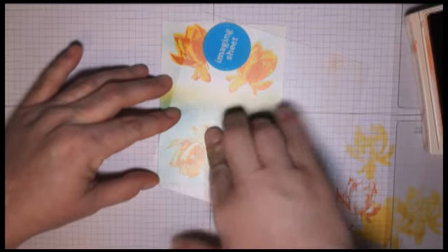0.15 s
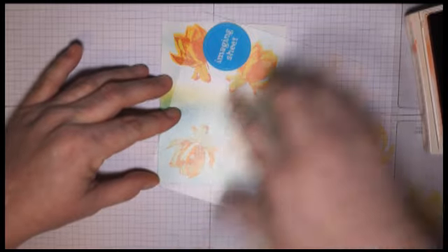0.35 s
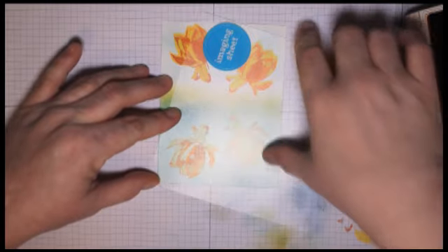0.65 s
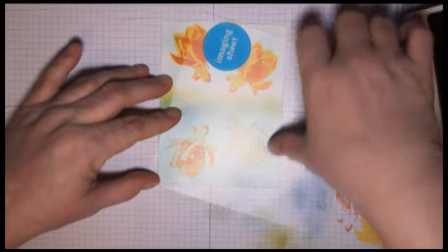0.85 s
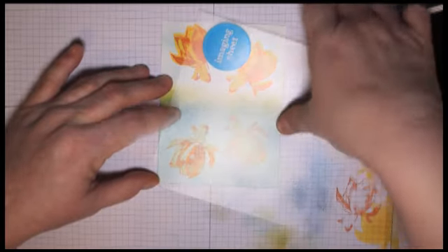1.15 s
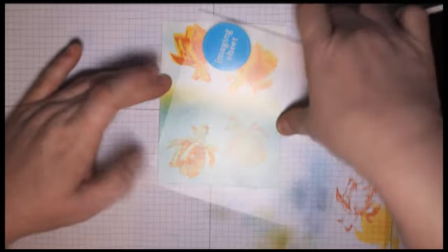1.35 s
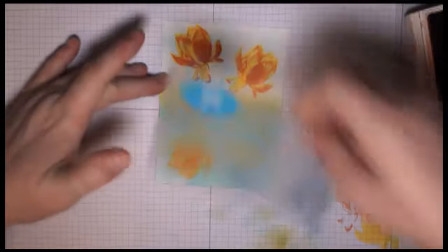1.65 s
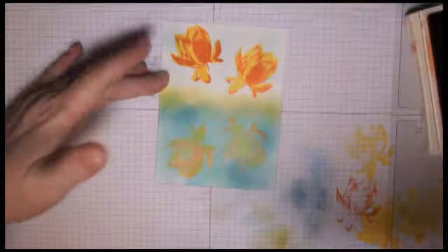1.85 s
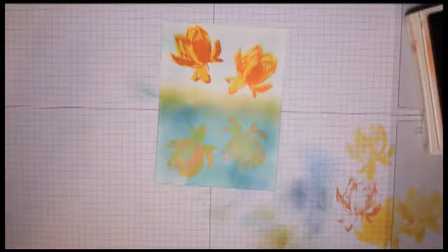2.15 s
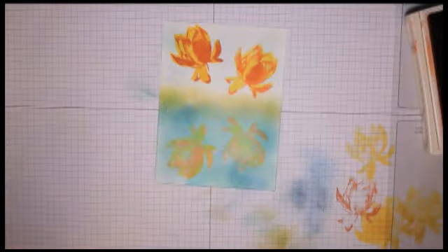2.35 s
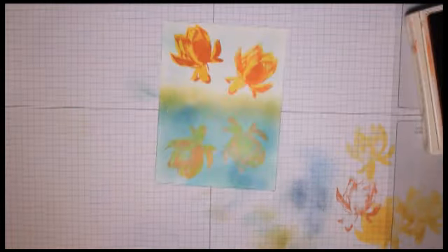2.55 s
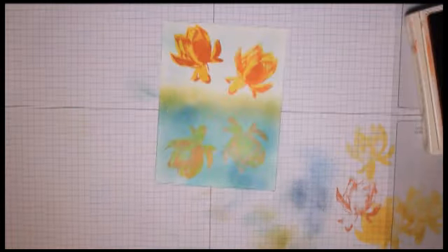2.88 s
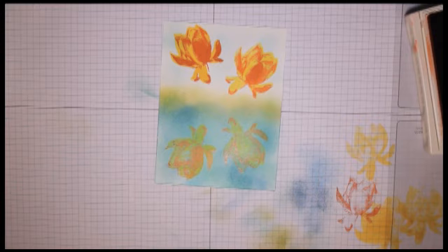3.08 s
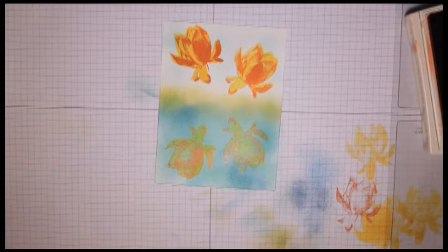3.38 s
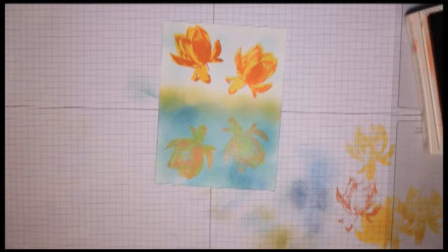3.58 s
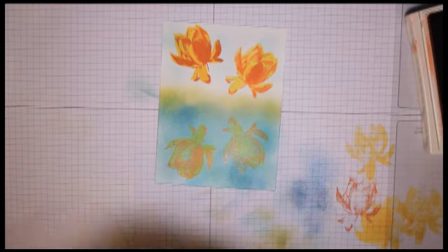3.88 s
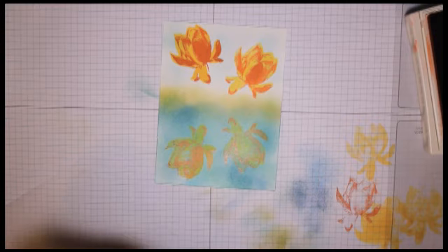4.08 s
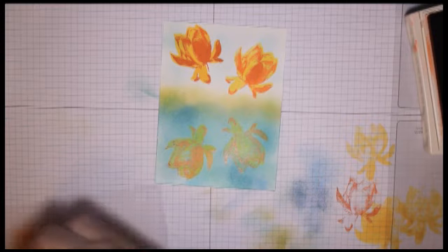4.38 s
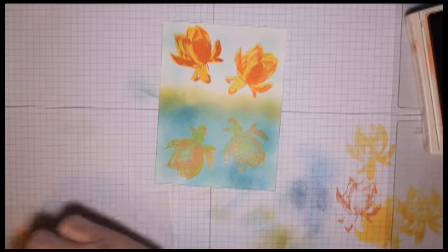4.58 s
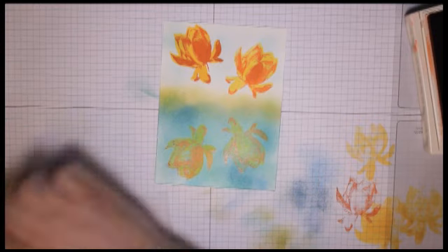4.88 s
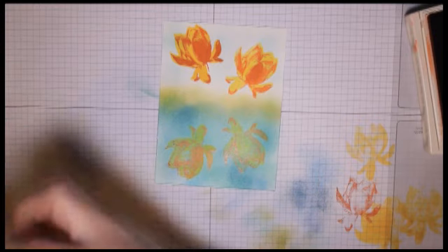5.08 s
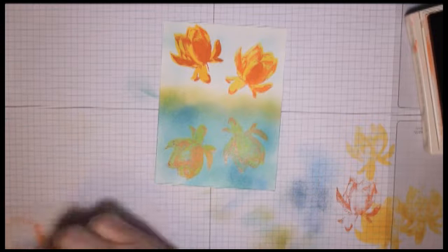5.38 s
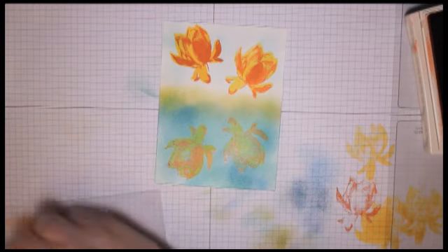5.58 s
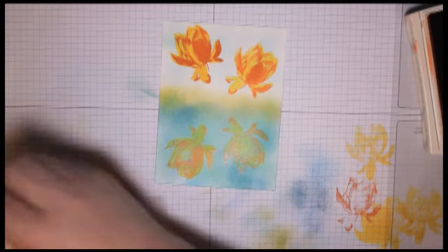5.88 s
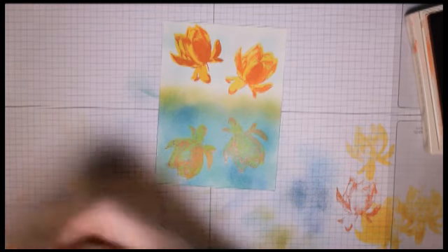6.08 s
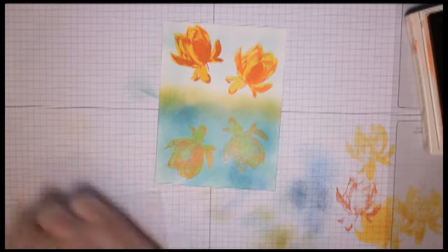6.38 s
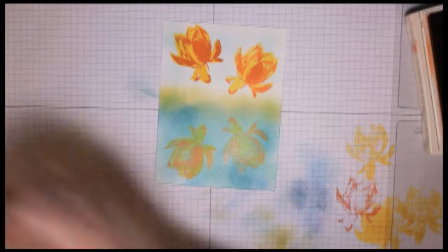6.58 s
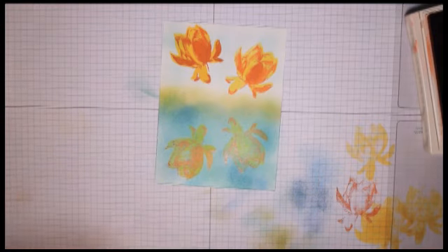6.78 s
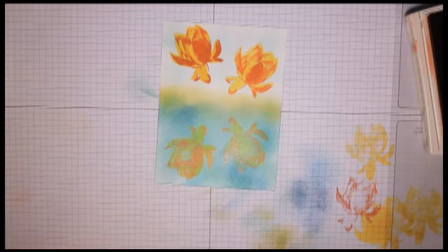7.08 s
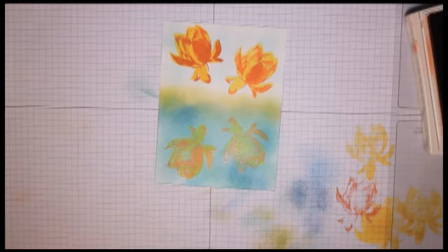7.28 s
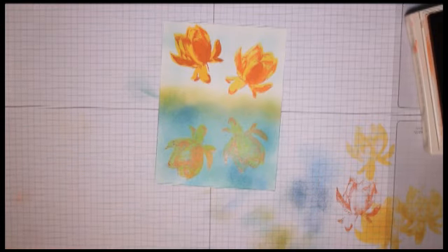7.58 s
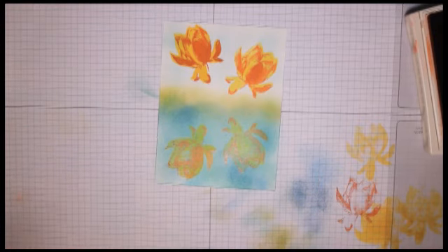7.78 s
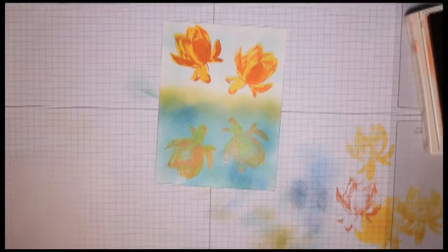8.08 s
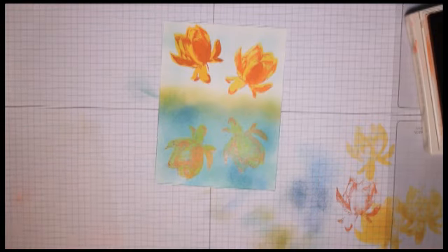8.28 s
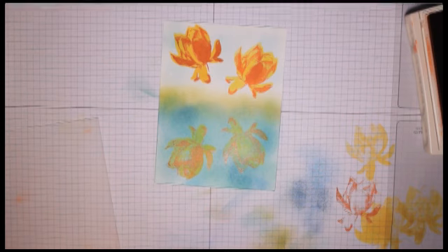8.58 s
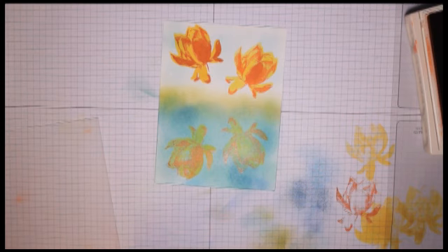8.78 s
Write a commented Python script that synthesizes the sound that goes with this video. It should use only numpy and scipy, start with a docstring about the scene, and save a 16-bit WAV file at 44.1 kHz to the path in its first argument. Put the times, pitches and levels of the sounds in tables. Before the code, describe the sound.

A quiet, close sound in a small room with a short decay, over faint motor hum and steady soft hiss. From 0 to 0.9 s, fingertips give faint rubs and short grainy strokes on card, with light taps. Between 1.2 and 1.65 s come several crisp ticks and papery scuffs, then faint sliding and a small tap at 2 s. At 2.7 s a hard, bright click strikes the table, followed by two lighter ones. From 3 to 5 s the plastic sheet slides in airy, uneven swishes, with tiny ticks and soft low bumps near 4.2 s. Gentler short strokes continue to 7 s, with dull knocks at 6.3, 6.5 and 6.9 s. At 7.17 s the edge skids squeakily; at 7.32 s the sheet buckles with a loud rising pop and hollow thump, then a weaker, ringing pop at 7.44 s. A crisp tap at 7.96 s and fading slides and ticks finish.

```python
"""At a craft table in a small room, hands rub a card and handle a clear plastic sheet close to one microphone.
The sheet slides as shaped noise; short noise bursts are scuffs and the bright part of some taps.
Rubbed card and skidding edge ring as friction through resonances; taps and damped low notes are decaying modes.
Twice the sheet buckles with a pop, a fast upward sweep that rings on, with low notes as its body.
The room answers as a decaying noise tail; a faint motor hum and a steady hiss lie under it all."""
import sys
import numpy as np
from scipy import signal
from scipy.fft import rfft, irfft, next_fast_len
from scipy.io import wavfile

SR = 44100
rng = np.random.default_rng(int(sys.argv[2]) if len(sys.argv) > 2 else 0)


def master(y):
    """Save y as 16-bit WAV."""
    cut = np.clip(np.atleast_2d(y).T, -1, 1)
    pcm = np.round(cut * 32767)  # scale
    wavfile.write(sys.argv[1], SR, pcm.astype(np.int16))


N = 394232
T = np.arange(N) / SR


def amp(db):
    """Decibels to gain."""
    return 10 ** (np.asarray(db) / 20)


def unit(x):
    """Scale to rms 1."""
    return x / np.sqrt(np.mean(x ** 2))


def seconds(length):
    """Time axis of a short sound."""
    return np.arange(int(length * SR)) / SR


def add(out, start_s, x):
    """Mix x into out from a given time."""
    i = int(start_s * SR)
    out[i:i + len(x)] += x[:len(out) - i]


def cut(x, hz, kind, order=2):
    """Low-pass or high-pass."""
    sos = signal.butter(order, min(hz, .45 * SR), kind, fs=SR, output="sos")
    return signal.sosfilt(sos, x)


def band(x, hz, width_hz):
    """One resonance, gain 1 at its centre."""
    centre_hz = min(hz, SR / 3)
    sharpness = hz / min(width_hz, SR / 3)
    b, a = signal.iirpeak(centre_hz, sharpness, fs=SR)
    return signal.lfilter(b, a, x)


def colour(x, points):
    """Shape the spectrum through points of pitch_hz, level_db; rms 1."""
    hz, db = np.transpose(points)
    size = next_fast_len(len(x))
    f = np.maximum(np.fft.rfftfreq(size, 1 / SR), 1)
    gain = amp(np.interp(np.log(f), np.log(hz), db))
    return unit(irfft(rfft(x, size) * gain, size)[:len(x)])


def decay(t, t60_s):
    """Exponential fade that falls 60 dB in t60_s."""
    return np.exp(-np.log(1000) * t / t60_s)


def ring(modes, t):
    """Sum of fading sine modes."""
    return sum(amp(db) * np.sin(2 * np.pi * hz * t) * decay(t, t60_s) for hz, t60_s, db in modes)


def walk(rate_hz):
    """Random drift with spread 1: straight lines between rate_hz random values a second."""
    values = rng.standard_normal(4096)
    return unit(np.interp(T * rate_hz, np.arange(len(values)), values))


def friction(grain_db, patchy_db):
    """Countless tiny slips of uneven size, bunched where the surfaces cling."""
    unevenness = np.minimum(rng.exponential(size=N), 6)
    slips = rng.standard_normal(N) * amp(grain_db * unevenness)
    return unit(slips * amp(patchy_db * walk(160)))


def flexing(x, wander_db):
    """As the sheet bends, neighbouring bands of its sound swell and sink on their own."""
    size = next_fast_len(N)
    octave = np.log2(np.maximum(np.fft.rfftfreq(size, 1 / SR), 1) / 1000)
    spectrum, out = rfft(x, size), np.zeros(N)
    centres = np.arange(0, 3.7, 1 / 4)  # octaves above 1 kHz
    for weight in np.eye(len(centres)):
        one_band = irfft(spectrum * np.interp(octave, centres, weight), size)[:N]
        out += amp(wander_db * walk(18)) * one_band
    return unit(out)


def stroke_of(x, start_s, length_s, fade_db):
    """A piece of friction that grips quickly, fades (swells if fade_db is negative) and lets go."""
    t = seconds(length_s + 0.0023)
    grip = np.clip(t / .003, 0, 1)
    release = np.clip((t[-1] - t) / .009, 0, 1)
    piece = x[int(start_s * SR):][:len(t)]
    return unit(piece * grip * release * amp(-fade_db * t / length_s))


def scrapes(strokes, resonances, grain_db, fade_db):
    """Stick and slip rings a few stiff resonances."""
    out, slips = np.zeros(N), friction(grain_db, patchy_db=1.2)
    body = sum(amp(db) * band(slips, hz, width_hz) for hz, width_hz, db in resonances)
    for start_s, length_s, db in strokes:
        add(out, start_s, amp(db) * stroke_of(body, start_s, length_s, fade_db))
    return out


# motor and mains hum: pitch_hz, level_db (rms, around which it wavers)
HUM_TONES = [(97, -64.5), (119.5, -64), (177, -59.5), (199.5, -68.5), (240.5, -63), (254, -69),
             (280, -74.5), (560, -71), (705, -81.5)]
# colour of room air and microphone hiss: pitch_hz, level_db (relative)
AIR_COLOUR = [(25, -21.5), (55, -10.5), (80, -9.5), (100, -10), (145, -1), (260, -1), (350, -6),
              (580, -3.5), (950, -8), (2500, -14.5), (5500, -17), (7000, -19.5), (12000, -21)]
AIR_DB = -53


def background():
    """Slightly wavering hum over even room noise."""
    hum = np.zeros(N)
    for hz, db in HUM_TONES:
        gain = amp(db + 2.16 * walk(6.5)) * np.sqrt(2)
        phase = 2 * np.pi * (hz * T + rng.random()) + .5 * walk(6.4)
        hum += gain * np.sin(phase)
    return hum + amp(AIR_DB) * colour(rng.standard_normal(N), AIR_COLOUR)


PUSH_RISE, PUSH_FALL = 0.35, 0.45  # shares of a push spent easing in and out


def push(length_s):
    """Speed of the hand over one push: it eases in, glides and eases out."""
    u = seconds(length_s) / length_s
    ramp = np.minimum(u / PUSH_RISE, (1 - u) / PUSH_FALL)
    return np.sin(np.pi / 2 * np.clip(ramp, 0, 1))


# pushes that slide the sheet: start_s, length_s, level_db, rasp_db (relative to the hiss);
# levels before the trims below
SHEET_PUSHES = [(0.036, .13, -67, 5), (0.252, 0.042, -54, -3.5), (.88, 0.17, -66, -1),
                (1.105, 0.025, -55, -12), (1.148, 0.11, -55, -17), (1.638, 0.36, -57.5, -11),
                (1.808, .07, -63, 3), (2.03, 0.25, -63.5, 3), (2.777, 0.23, -56.5, -3),
                (3.04, 0.12, -53.5, -5), (3.15, 0.22, -49, -10), (3.42, 0.058, -55, -19),
                (3.461, 0.45, -48.5, -3.5), (3.63, 0.06, -54, -30), (3.882, 0.11, -48.5, -4),
                (3.984, .12, -47.5, -7), (4.097, 0.27, -49.5, -4), (4.344, 0.047, -52, -5),
                (4.41, 0.1, -52, -0.5), (4.597, 0.24, -58.5, -12), (4.824, 0.12, -53.5, -4.5),
                (4.96, 0.087, -59, -1), (5.047, 0.2, -57.5, -8), (5.258, 0.14, -56.5, -3),
                (5.535, 0.24, -57.5, -6), (5.737, 0.14, -53.5, -2), (5.879, .045, -55, -11),
                (5.968, 0.13, -58.5, 1), (6.11, 0.1, -56.5, -7), (6.312, 0.19, -54.5, -8),
                (6.455, 0.071, -51, -5), (6.617, 0.3, -56.5, -4), (6.839, 0.065, -46, -7.5),
                (6.89, 0.16, -59.5, -2), (7.036, 0.097, -51, -12), (7.654, .1, -46.5, -4),
                (7.993, 0.31, -50, -2.5), (8.069, 0.03, -57.5, 3), (8.209, 0.048, -48, -4),
                (8.42, 0.18, -57, -6.5), (8.583, 0.092, -54.5, -18), (8.68, 0.34, -58, -6)]
# colour of the sliding hiss: pitch_hz, level_db (relative)
HISS_COLOUR = [(1500, -27), (3000, -5.5), (4300, 1.5), (5800, 2.5), (7200, -1), (10000, 1.5), (12000, -0.5)]
# colour of the lower, coarser rasp: pitch_hz, level_db (relative)
RASP_COLOUR = [(300, -6.5), (600, 2), (850, -10.5), (1200, 4), (1900, 4.5), (2600, 2), (4000, -2.5),
               (9000, -48)]
HISS_TRIM_DB, RASP_TRIM_DB = 2, -0.5
SNAG_DB, SNAG_GRAIN_DB = -9, 6.5  # sparse snags among the slips


def slides():
    """The moving sheet hisses and now and then snags; more pressure adds a lower rasp."""
    hiss_gain, rasp_gain = np.zeros(N), np.zeros(N)
    for start_s, length_s, db, rasp_db in SHEET_PUSHES:
        add(hiss_gain, start_s, amp(db) * push(length_s))
        add(rasp_gain, start_s, amp(db + rasp_db) * push(length_s))
    snags = amp(SNAG_DB) * friction(SNAG_GRAIN_DB, patchy_db=5)
    slips = flexing(friction(grain_db=2.0, patchy_db=1.45) + snags, wander_db=2.5)
    hiss = amp(HISS_TRIM_DB) * hiss_gain * colour(slips, HISS_COLOUR)
    rasp = amp(RASP_TRIM_DB) * rasp_gain * colour(slips, RASP_COLOUR)
    return hiss + rasp


# fingertips dragged over card and mat: start_s, length_s, level_db (rms)
FINGER_RUBS = [(.05, 0.08, -61), (.245, 0.083, -61), (.686, 0.057, -45.5), (.788, 0.048, -49.5),
               (.822, 0.046, -48)]
# resonances of the rubbed card: pitch_hz, width_hz, level_db (relative)
CARD_RESONANCES = [(392, 310, 0.5), (700, 23, 10.5), (1080, 170, -6), (1470, 390, -3.5), (2000, 250, -28),
                   (2820, 220, -4), (3830, 260, -7), (5040, 380, -11)]


def rubs():
    """Fingertips stick and slip, ringing the resonances of the card."""
    return scrapes(FINGER_RUBS, CARD_RESONANCES, grain_db=2.2, fade_db=1.5)


# short noise bursts: scuffs of fingers and sheet, and the bright noise in some taps:
# start_s, length_s, level_db (rms), centre_hz, width_hz, fade_db (over the burst)
NOISE_BURSTS = [(0.308, .018, -50.5, 2700, 6000, 0), (1.156, 0.037, -52, 5030, 6000, 8),
                (1.19, 0.048, -54, 1960, 3000, 17), (1.496, 0.1, -48.5, 1600, 1200, 1),
                (1.501, 0.17, -50.5, 6600, 7200, 14), (1.609, 0.039, -48, 1100, 600, 2),
                (1.621, 0.033, -46, 3680, 1100, 12), (2.688, 0.0087, -33, 1950, 500, 6),
                (2.697, .01, -42, 6000, 7000, 8), (2.712, .011, -49, 2090, 800, 3),
                (2.713, 0.022, -44, 6500, 8000, 3), (2.775, 0.016, -45.5, 8000, 8000, 3),
                (3.058, 0.05, -56.5, 4150, 500, -1), (3.92, 0.033, -46.5, 9500, 1800, 4),
                (4.034, 0.076, -52, 2200, 1510, 6), (4.251, 0.028, -49, 1700, 1500, -7),
                (5.456, 0.06, -52, 1470, 2000, 1), (5.763, 0.057, -48.5, 6060, 2500, -6),
                (5.816, 0.021, -46, 2130, 1800, 5), (6.322, 0.026, -56.5, 2490, 250, 3),
                (6.642, 0.024, -53, 2600, 2500, 5), (7.213, 0.092, -47.5, 4400, 4000, -20),
                (7.306, 0.033, -41.5, 7060, 8100, 3), (7.336, 0.039, -41.5, 5150, 4030, 1),
                (7.364, 0.12, -54.5, 4800, 4000, 12), (7.961, 0.043, -39.5, 3800, 5000, 13),
                (8.161, 0.038, -45.5, 2110, 450, -11)]


def scuffs_and_tap_noise():
    """Short bursts of friction noise, each through one resonance: broad ones rustle, narrow ones sing."""
    out, slips = np.zeros(N), flexing(friction(grain_db=2.5, patchy_db=-0.1), wander_db=-0.5)
    for start_s, length_s, db, centre_hz, width_hz, fade_db in NOISE_BURSTS:
        body = band(slips, centre_hz, width_hz)
        add(out, start_s, amp(db) * stroke_of(body, start_s, length_s, fade_db))
    return out


# taps of nails and sheet on the table:
# start_s, peak_db, lowest_hz, highest_hz, note_hz (of the struck spot)
TABLE_TAPS = [(.312, -29.5, 500, 7000, 1480), (0.5708, -32, 1500, 9000, 4450), (0.85, -31, 400, 2500, 1400),
              (1.194, -23, 687, 4900, 1670), (1.3967, -21, 1420, 2740, 1300),
              (1.464, -39, 1000, 2500, 1300), (1.5026, -19.5, 500, 6000, 1170),
              (1.6263, -37, 800, 7500, 3700), (2.0271, -27.5, 200, 4000, 520),
              (2.6897, -9, 238, 4420, 1040), (2.7698, -25, 750, 5500, 1230), (2.7846, -26, 704, 3520, 1020),
              (3.199, -29, 1200, 9000, 3530), (3.352, -28.5, 1000, 8000, 1700),
              (4.155, -32, 900, 7000, 1500), (4.474, -32, 900, 3000, 1470), (6.645, -37, 1200, 5000, 2800),
              (7.15, -43, 3000, 6000, 4400), (7.2647, -24, 300, 1500, 1080),
              (7.948, -26, 2500, 11000, 4800), (7.9645, -19.5, 875, 7060, 1880),
              (8.608, -32.5, 600, 2500, 1120), (8.756, -34.5, 1500, 6000, 3420)]
# what the table top rings with: pitch_hz, t60_s, level_db (relative)
TABLE_MODES = [(262, 0.14, -20), (465, 0.15, -21), (700, 0.098, -16), (1057, 0.079, -49),
               (1670, 0.057, -35), (2070, 0.017, -28.5), (2390, 0.013, -9), (3670, 0.017, -16)]


def taps():
    """A sharp contact, a brief bright chatter, the note of the struck spot and the ring of the table."""
    out, t = np.zeros(N), seconds(.12)
    for start_s, peak_db, low_hz, high_hz, note_hz in TABLE_TAPS:
        chatter = amp(-24) * cut(rng.standard_normal(len(t)), 1140, "high") * np.exp(-t / 0.0038)
        note = ring([(note_hz, .012, -21)], t)
        blow = chatter + amp(-20.0) * ring(TABLE_MODES, t) + note
        blow[0] += 1  # the contact itself
        # a softer contact is duller, a lighter one thinner
        blow = cut(cut(blow, low_hz, "high"), high_hz, "low")
        add(out, start_s, -amp(peak_db) * blow / np.abs(blow).max())
    return out


# damped low notes, one or more per event: soft knocks, and the low body of the sheet's pop:
# start_s, level_db (before onset and decay), pitch_hz, t60_s
LOW_NOTES = [(1.84, -47, 272.6, 0.61), (2.028, -31.5, 510, 0.024), (2.027, -43, 70, 0.1),
             (2.305, -47, 50, .08), (2.401, -42, 60, 0.088), (2.808, -41, 258, 0.042),
             (3.804, -40, 110, 0.35), (4.15, -41.5, 126, 0.31), (4.244, -35, 133, 0.085),
             (4.25, -33, 417, 0.11), (4.254, -41, 290, 0.11), (6.342, -32, 151, 0.07),
             (6.511, -33.5, 115, 0.043), (6.51, -40, 590, 0.051), (6.908, -30, 440, 0.081),
             (6.908, -36, 210, 0.12), (7.261, -28, 150, 0.13), (7.264, -30, 495, 0.2),
             (7.282, -40, 212, 0.063), (7.318, -14.5, 320, 0.047), (7.316, -20, 155, 0.035),
             (7.442, -39, 124, 0.21), (8.212, -40, 105, 0.35), (8.231, -36, 192, 0.066)]


def low_notes():
    """Each note sets in softly and decays: a sine with a rumble around its pitch."""
    out, t = np.zeros(N), seconds(.4)
    soft_onset = 1 - np.exp(-t / 0.0018)
    for start_s, db, hz, t60_s in LOW_NOTES:
        rumble = unit(band(band(rng.standard_normal(len(t)), hz, hz), hz, hz))
        body = 0.83 * np.sin(2 * np.pi * hz * t) + 0.34 * rumble
        add(out, start_s, amp(db) * body * soft_onset * decay(t, t60_s))
    return out


# edge of the sheet catching and skidding: start_s, length_s, level_db (rms)
EDGE_SKIDS = [(7.148, 0.0093, -49), (7.171, 0.034, -37.5)]
# resonances of the skidding edge: pitch_hz, width_hz, level_db (relative)
EDGE_RESONANCES = [(1650, 560, 5.5), (2150, 210, 7.5), (3600, 580, 5.5), (4280, 170, 11.5)]


def skids():
    """The edge sticks and slips, ringing its own resonances."""
    return scrapes(EDGE_SKIDS, EDGE_RESONANCES, grain_db=1, fade_db=3)


ROOM_T60_S, ROOM_TREBLE_T60_S = 0.34, 0.3
ROOM_DB = -12  # send of the hand sounds


def room(x):
    """A diffuse tail that starts with the nearest walls, holds little bass and loses its treble first."""
    t = seconds(.6)
    noise = cut(rng.standard_normal(len(t)), 200, "high")
    low = cut(noise, 2200, "low") * decay(t, ROOM_T60_S)
    high = amp(2.5) * cut(noise, 1850, "high") * decay(t, ROOM_TREBLE_T60_S)
    onset = np.clip((t - .003) / 0.00085, 0, 1)
    # level the tail by the energy of its decay
    tail = (low - high) * onset / np.sqrt(SR * ROOM_T60_S / np.log(1000 ** 2))
    return signal.fftconvolve(x, tail)[:N]


# the bowed sheet snaps through: start_s, length_s, level_db (before filtering),
# first_hz, last_hz, ring_db and room_db (gains on the pop)
SHEET_POPS = [(7.316, 0.0059, -6.5, 388, 2520, -1.5, -9), (7.4387, 0.0068, -16.5, 406, 1430, 6.5, 0.5)]
# what the sheet rings with: pitch_hz, t60_s, level_db (relative)
SHEET_MODES = [(392, 0.068, -39), (434, 0.043, -39.5), (487, 0.25, -51), (655, 0.19, -89),
               (763, 0.37, -56.5), (800, 0.17, -55), (1090, 0.72, -73), (1101, 0.33, -56),
               (1180, 0.41, -55), (1350, 0.32, -51), (1395, 0.45, -57), (1490, 0.49, -70),
               (1790, 0.23, -68), (1860, 0.18, -63), (1980, 0.12, -59), (2360, 0.19, -49),
               (2940, 0.14, -64)]
# force of the flip: rise_power (of time), closing_share (of its length, in which it stops)
FLIP_SHAPE = (.5, .06)
BOUNCE_S, BOUNCE_DB = 0.00165, -4  # the table top mirrors the pop


def buckles():
    """The bulge shrinks as it flips, so its pitch shoots up within milliseconds; sheet and room ring on."""
    direct, far = np.zeros(N), np.zeros(N)
    sheet = ring(SHEET_MODES, seconds(.5))
    rise_power, closing_share = FLIP_SHAPE
    for start_s, length_s, db, first_hz, last_hz, ring_db, room_db in SHEET_POPS:
        u = seconds(length_s) / length_s
        hz = 1 / ((1 - u) / first_hz + u / last_hz)  # the period shrinks evenly
        # loudest just before the bulge stops
        swell = u ** rise_power * np.clip((1 - u) / closing_share, 0, 1)
        flip = -np.sin(2 * np.pi * np.cumsum(hz) / SR) * swell / swell.max()
        pop = np.pad(flip, (0, len(sheet)))
        # the sheet whips taut at the end of the flip and crackles briefly
        t = seconds(.05)
        crackle = unit(band(rng.standard_normal(len(t)), 1400, 930)) * np.exp(-t / 0.0035)
        add(pop, length_s, amp(-22.0) * crackle)
        pop = amp(db) * cut(cut(pop, 4600, "low"), 250, "high")
        ringing = amp(ring_db) * signal.fftconvolve(pop, sheet)[:len(pop)]
        add(direct, start_s, pop + ringing)
        add(direct, start_s + BOUNCE_S, amp(BOUNCE_DB) * pop)
        add(far, start_s, amp(room_db) * pop)
    return direct + room(far)


def scene():
    """Everything reaches one microphone, alike in both channels."""
    close = slides() + scuffs_and_tap_noise() + rubs() + skids() + taps() + low_notes()
    mono = close + amp(ROOM_DB) * room(close) + buckles() + background()
    return np.array([mono, mono])


def record(dry):
    """The recorder cuts the treble steeply above 12.05 kHz."""
    sos = signal.ellip(10, .2, 70, 12050, fs=SR, output="sos")  # ripple and stopband in dB
    return signal.sosfilt(sos, dry)


dry = scene()
out = record(dry)
master(out)
```